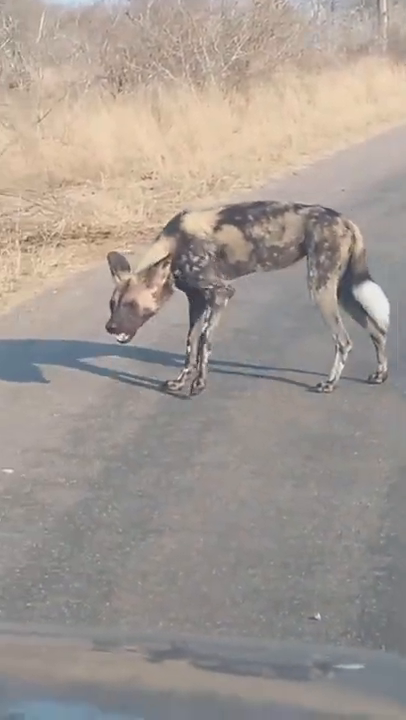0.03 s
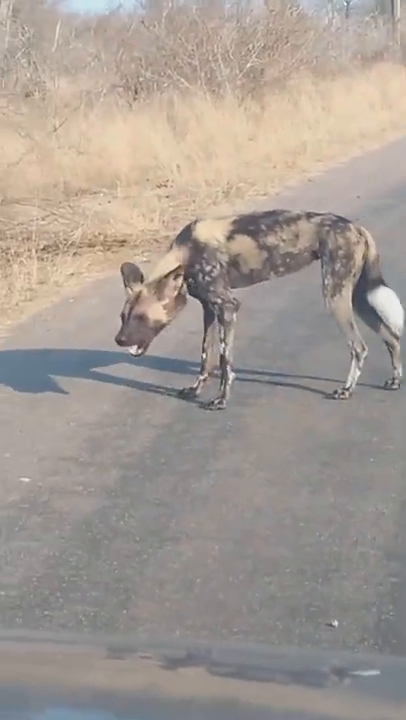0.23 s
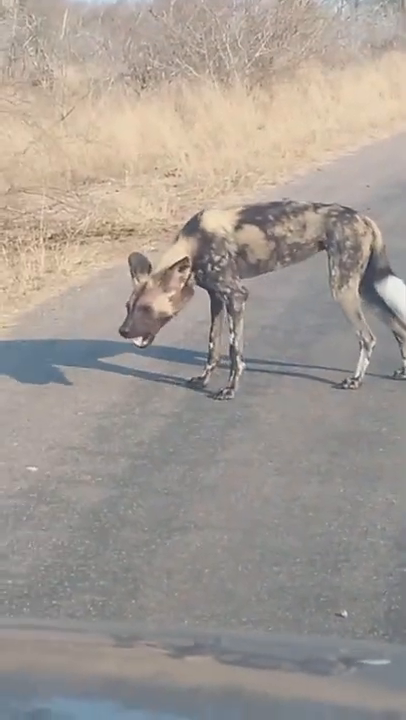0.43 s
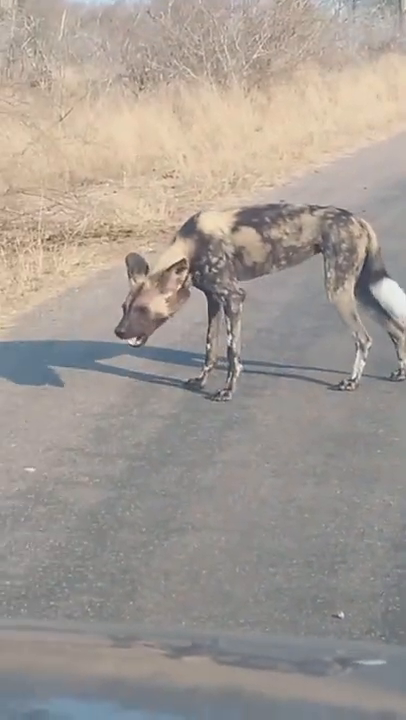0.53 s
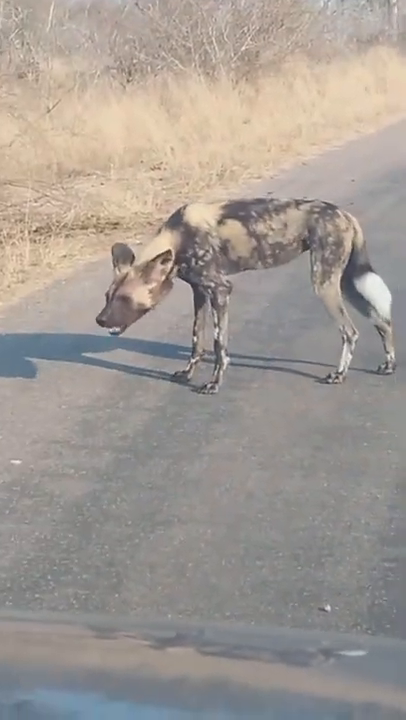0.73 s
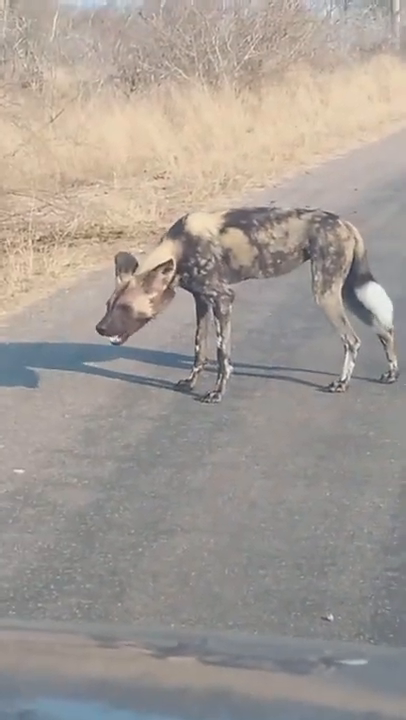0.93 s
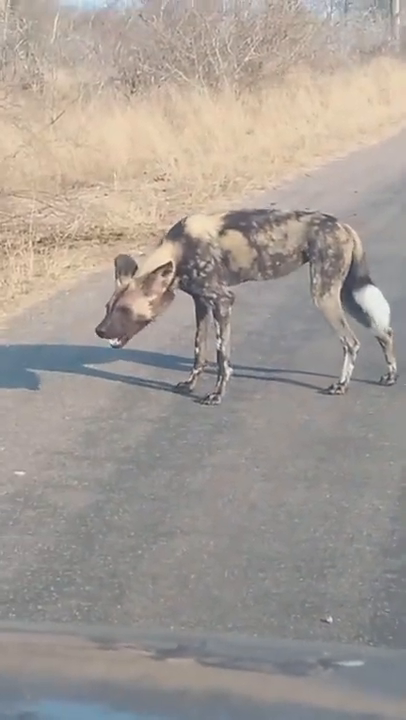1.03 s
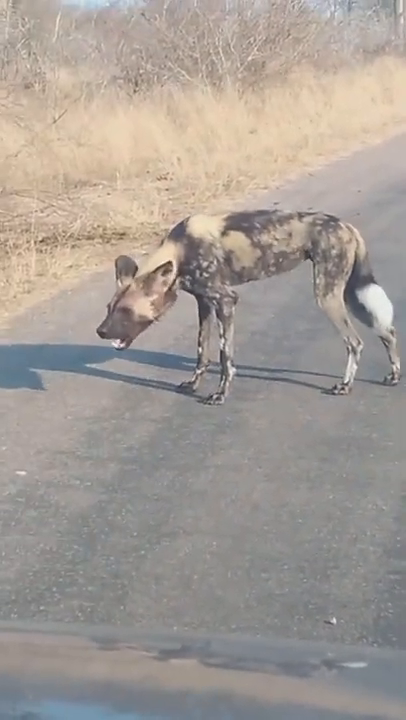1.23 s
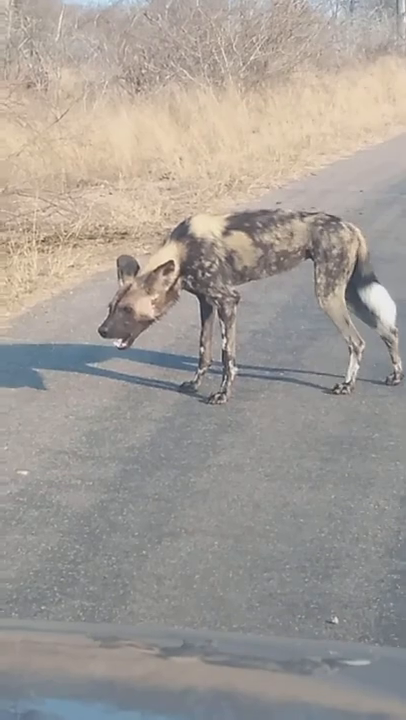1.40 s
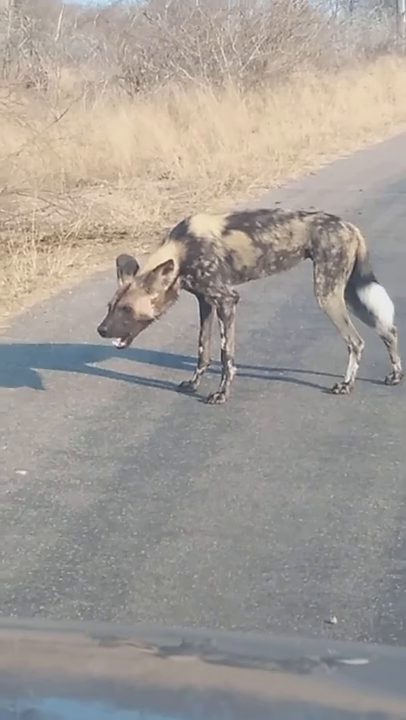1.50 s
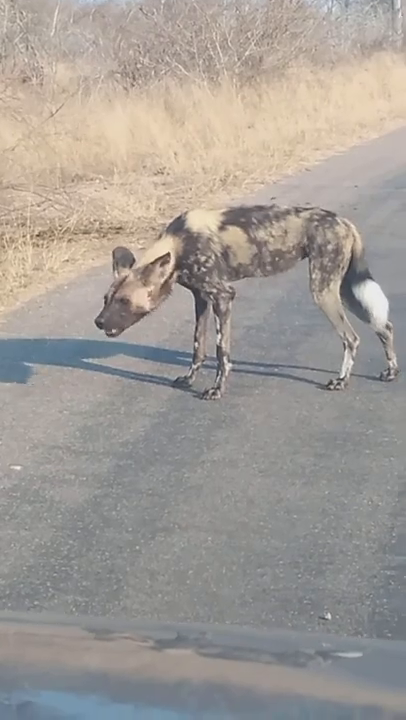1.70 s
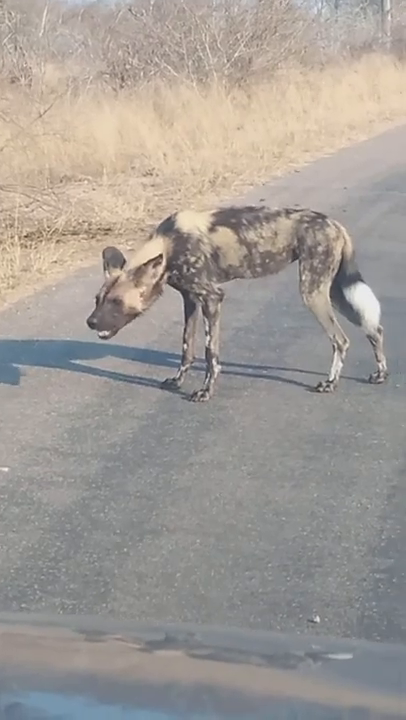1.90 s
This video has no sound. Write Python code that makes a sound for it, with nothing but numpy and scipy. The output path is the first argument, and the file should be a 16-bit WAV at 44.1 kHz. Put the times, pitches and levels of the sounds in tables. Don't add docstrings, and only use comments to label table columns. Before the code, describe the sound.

A wild dog hoots twice, each call short, mellow and nearly pure, scooping up then holding, about a second apart. A vehicle idles low close by in open dry bush; a phone takes it in from the car.

```python
import sys
import numpy as np
from scipy import signal
from scipy.fft import rfft, irfft, next_fast_len
from scipy.io import wavfile
from scipy.ndimage import uniform_filter1d, map_coordinates

SR = 44100
rng = np.random.default_rng(int(sys.argv[2]) if len(sys.argv) > 2 else 0)


def volts_from_decibels(level):
    exponent = np.asarray(level, float) / 20
    return 10 ** exponent


def dump_mix(stems):
    frames = np.atleast_2d(stems).T
    limited = np.clip(frames, -1, 1)
    pcm = np.round(limited * 32767).astype(np.int16)
    wavfile.write(sys.argv[1], SR, pcm)


N = 85995
T = np.arange(N) / SR
SIDE = np.array([[.5], [-.5]])

# time in seconds, level in dB, overtone level in dB, nasal hiss in dB.
HOOT_COURSE = [
    [(.195, -40.5, 1.5, -45), (.222, -20.5, 4, -51.5), (.255, -22.5, -11.5, -36.5), (.3, -20, -3.5, -35),
     (.355, -20, -4.5, -37.5), (.4, -26, 5, -58), (.49, -21.5, 1.5, -78.5), (.585, -27, 5, -18.5),
     (.645, -31.5, -21, -39)],
    [(1.205, -47.5, 5, -40), (1.238, -22, -8, -38), (1.27, -24.5, -3, -50.5), (1.32, -19.5, -7.5, -53),
     (1.355, -23.5, -3, -42), (1.4, -20, -1.5, -49.5), (1.47, -22.5, 0.5, -50), (1.582, -23, -4.5, -31),
     (1.612, -40.5, -13, -18)],
]
# start in seconds, length in seconds, top pitch in Hz, whistle level in dB.
VOICING = [
    (.197, .41, 691, 0),
    (1.214, .39, 685, 0),
]
START_HZ, SCOOP_HZ_PER_S, RISE_HZ, RISE_S, SAG_HZ = 530, 5300, 36, .065, 15
# multiple of the voice pitch, level in dB.
FIRST_OVERTONES = [(1, 0), (2, -30.5), (3, -53), (4, -66.5), (5, -39.5), (6, -54.5), (7, -42.5), (8, -32),
                   (9, -35.5), (10, -37), (11, -35.5), (12, -38.5), (13, -43.5), (14, -61.5), (15, -59.5),
                   (16, -53), (17, -51), (18, -55), (19, -66.5), (20, -67), (21, -64)]
SECOND_OVERTONES = [(1, 0), (2, -31.5), (3, -56.5), (4, -61.5), (5, -39), (6, -42), (7, -37.5), (8, -28.5),
                    (9, -38), (10, -45), (11, -38.5), (12, -30.5), (13, -51.5), (14, -51), (15, -52),
                    (16, -58.5), (17, -65.5), (18, -60), (19, -59), (20, -60), (21, -60)]
RING_GROWS_S, LATER_S, FADE_S = .08, .014, .015
# multiple, delay in seconds.
HELD_BACK = [{2: .035, 9: .03, 10: .06}, {2: .045, 9: .15, 10: .1}]
PROMPT = [(5, 7, 8), (5, 6, 7)]
CLOSING_SWELL = {6: 11, 8: 4, 14: 5, 16: 5}
CLOSING_S, CLOSING_WIDTH_S = -.035, .025
FLUTTER_DB, FRAY_RAD = 1.6, .17
# frequency in Hz, density in dB per Hz.
NASAL_HISS = [(7000, -120), (7600, -8.5), (8200, 11.5), (9500, -7.5), (9900, -25.5), (10600, -120)]

LEAD_S, LEAD_WIDTH_S, LEAD_DB, LEAD_HZ, LEAD_RISE_HZ_PER_S = 0, .007, -45.5, 1065, 4500
# frequency in Hz, density in dB per Hz.
THROAT_AIR = [(800, -120), (980, -8), (1070, 0), (1200, -8), (1350, -25), (1700, -120)]
THROAT_DB, THROAT_T60_S, THROAT_HELD_DB = -60, .5, -70
# time in seconds, pitch in Hz, level in dB.
THROAT_GULPS = [
    (.179, 620, -47),
    (1.186, 640, -54),
]
GULP_WIDTH_S = .005

# time in seconds, pitch in Hz, level in dB.
NOSE_WHISTLES = [
    [(.186, 9100, -80), (.2, 9120, -51), (.217, 9110, -59), (.243, 9290, -48), (.285, 9520, -52),
     (.32, 9560, -75), (.575, 9560, -80), (.592, 9480, -50), (.61, 9300, -70)],
    [(1.2, 9200, -80), (1.215, 9220, -64), (1.25, 9250, -44), (1.29, 9430, -46), (1.315, 9600, -50),
     (1.35, 9600, -72), (1.575, 9600, -78), (1.592, 9550, -50), (1.61, 9450, -70)],
]
SIDEBANDS = [
    [-4, -6, -15],
    [-1, -4, -21],
]
EARLY_SIDEBANDS = [.1, .7]

# frequency in Hz, density in dB per Hz.
ONSET_CATCH = [(3000, -120), (3500, -6.5), (3800, 3), (4300, -19.5), (5300, -17), (5800, -18.5), (7000, -120)]
CATCH_S, CATCH_WIDTH_S, CATCH_DB = 0.025, 0.012, -61
# frequency in Hz, density in dB per Hz.
CLOSING_PUFF = [(600, -60), (780, 0), (1000, -6), (1500, -14), (2500, -40), (5000, -29), (10800, -23),
                (12500, -55)]
PUFF_S, PUFF_WIDTH_S, PUFF_DB = -.02, .011, -48

# frequency in Hz, density in dB per Hz.
NOSTRIL_AIR = [(13600, -120), (14000, -4), (14500, 0), (14900, -6), (15200, -120)]
# time in seconds, width in seconds, level in dB.
NOSTRIL_BURSTS = [
    (.48, .045, -82),
    (1.33, .06, -78),
    (1.545, .016, -73),
]
# frequency in Hz, density in dB per Hz.
RASP_AIR = [(5500, -120), (5900, -6), (6300, 0), (6800, -3), (7200, -120)]
# time in seconds, width in seconds, level in dB.
RASP_BURSTS = [
    (1.3, .03, -66),
    (1.36, .03, -70),
    (.25, .02, -72),
]

# frequency in Hz, left minus right in dB.
SHADING = [(680, -5.5), (1370, 5.5), (3400, -0.5), (4200, 1), (5500, 2), (7500, 5), (9000, 10.5),
           (14000, 15.5)]
# frequency in Hz, lead of the left in radians.
LEFT_LEAD = [(680, 0.58), (1370, -1.36), (3400, -1.84), (5500, -1.25), (7500, -2), (9000, -2)]

# frequency in Hz, 60 dB decay time in seconds.
BUSH_DECAY = [(600, 0.93), (2000, 1), (6000, 0.51), (12000, 1)]
# frequency in Hz, gain in dB.
SCATTER_COLOUR = [(800, -1), (1300, 10.5), (9000, 10), (10500, 14), (12000, -0.5)]
BUSH_DB, BUSH_FAR_S, BUSH_EDGE_S, BUSH_STEP_DB = -15, .125, .01, -9
# delay in seconds, level in dB, left minus right in dB.
GROUND_ECHOES = [(.072, -25.5, -8.5), (.1007, -11, -3.5), (.125, -19.5, -3.5), (.21, -29, -7)]

# frequency in Hz, rms level in dB, left minus right in dB.
ENGINE_TONES = [(61.95, -45, 3), (111, -50.5, -1), (168.1, -52, 0.5), (222.6, -58.5, -0.5),
                (324.6, -59.5, 8)]
# frequency in Hz, density in dB per Hz.
ENGINE_RUMBLE = [(25, -20), (60, -17), (118, -1), (400, -12.5), (700, -19.5), (900, -24), (1150, -41.5),
                 (2200, -60.5)]
CYLINDERS = [0, -6, -2, -7]
# frequency in Hz, width in Hz, level in dB.
VALVE_COVER = [(1617, 42, 1.5), (1547, 60, -5), (1463, 86, -9.5)]
RUMBLE_DB, CYCLE_HZ, TICK_DB = -46, 7.15, -66.5

# frequency in Hz, density in dB per Hz.
AIR_HISS = [(1060, -39), (1800, -13), (1970, -3.5), (3440, -17), (6560, -12), (10000, -14.5), (15400, -23)]
# frequency in Hz, left-right likeness as a ratio.
COHERENCE = [(60, 0.93), (180, 0.89), (550, 0.78), (1640, 0.53), (4960, 0.04), (14900, 0.14)]
HISS_DB, DUCK_DB = -78.5, -24
# start in seconds, length in seconds, first pitch in Hz, last pitch in Hz.
BIRD_NOTES = [(1.765, .125, 6320, 6900), (1.875, .09, 6880, 6820), (.925, .045, 6880, 7000),
              (1.078, .1, 6860, 6880), (.75, .13, 2500, 2460), (.08, .05, 9280, 9280),
              (.11, .07, 8000, 8000), (.085, .03, 13800, 13800), (1.04, .036, 7850, 7700),
              (1.17, .02, 7050, 7500), (1.28, .02, 6200, 6230), (1.298, .03, 6450, 6600)]
# level in dB, left minus right in dB.
BIRD_LEVELS = [(-73.5, 11.5), (-76.5, 9), (-85, -14), (-86, -10), (-84.5, -15), (-87.5, 11.5), (-87, 12),
               (-85, 12), (-85, -10), (-84, 0), (-62, 0), (-69, 0)]
# frequency in Hz, density in dB per Hz.
LIP_SMACK = [(4500, -60), (5300, -4), (6300, -14), (7400, 0), (8500, -12), (10500, -3), (11300, -60)]
SMACK_S, SMACK_WIDTH_S, SMACK_DB = 1.18, .007, -77
# frequency in Hz, density in dB per Hz.
PAW_GRIT = [(6000, -120), (7500, -8), (11000, -18), (14000, -9), (15200, -120)]
SCUFF_S, SCUFF_LENGTH_S, SCUFF_DB = 0.094, 0.078, -71.5


def unit(x):
    return x / np.sqrt(np.mean(x ** 2) + 1e-20)


def along(points, hz):
    f, v = np.transpose(points)
    return np.interp(np.log(hz + 1), np.log(f + 1), v)


def wobble(rate):
    return map_coordinates(rng.standard_normal(size=800), [T * rate])


def bump(s, width):
    return np.exp(-.5 * ((T - s) / width) ** 2)


def columns(rows):
    s, *cols = np.transpose(rows)
    curves = [np.interp(T, s, c) for c in cols]
    gate = np.clip((T - s[0]) / .004, 0, 1) * np.clip((s[-1] - T) / .012, 0, 1)
    return curves + [gate]


def filtered(x, response):
    m = next_fast_len(N + SR // 2)
    return irfft(rfft(x, m) * response(np.fft.rfftfreq(m, 1 / SR)), m)[..., :N]


def tone(hz):
    return np.sqrt(2) * np.sin(2 * np.pi * (np.cumsum(hz) / SR + rng.random()))


def noise(spectrum):
    return unit(filtered(rng.standard_normal(N), lambda f: volts_from_decibels(along(spectrum, f))))


def rush(spectrum, patchy_db):
    z = signal.stft(rng.standard_normal((2, N + 512)), nperseg=512)[2]
    field = uniform_filter1d(rng.standard_normal(z.shape[1:]), size=6, axis=0)
    field = uniform_filter1d(field, size=14, axis=1)
    pair = signal.istft(z * volts_from_decibels(patchy_db * unit(field)), nperseg=512)[1][:, :N]

    def mid_side(hz):
        inside = (hz > spectrum[0][0]) * (hz < spectrum[-1][0])
        turn = np.arccos(np.clip(along(COHERENCE, hz), -1, 1)) / 2
        return volts_from_decibels(along(spectrum, hz)) * inside * [np.cos(turn), np.sin(turn)]

    mid, side = filtered(pair, mid_side)
    return unit(np.array([mid + side, mid - side]))


def voice_pitch(which):
    start, length, top_hz, _ = VOICING[which]
    u = np.clip(T - start, 0, length)
    held = top_hz - RISE_HZ * np.exp(-u / RISE_S) - SAG_HZ * (u / length) ** 4
    return uniform_filter1d(np.minimum(START_HZ + SCOOP_HZ_PER_S * u, held), size=400)


def voice(which, overtones, hz):
    start, length = VOICING[which][:2]
    level_db, ring_db, hiss_db, on = columns(HOOT_COURSE[which])
    t = T - start
    phase = 2 * np.pi * np.cumsum(hz * (1 + 0.0018 * wobble(40))) / SR
    voiced = np.sin(phase)
    for k, db in overtones[1:]:
        delay = .02 + LATER_S * max(k - 13, 0) + HELD_BACK[which].get(k, 0)
        growth_s = RING_GROWS_S / (4 if k in PROMPT[which] else 1)
        grown = np.clip((t - delay) / growth_s, 0, 1)
        grown = grown * np.clip((length - t - .001 * k) / FADE_S, 0, 1)
        closing_db = CLOSING_SWELL.get(k, 0) * bump(start + length + CLOSING_S, CLOSING_WIDTH_S)
        flutter_db = (k > 2) * FLUTTER_DB * (3 if k == 3 else 1) * wobble(150)
        size = volts_from_decibels(db + ring_db + 1.6 * wobble(35) + flutter_db + closing_db)
        fray = (k > 2) * FRAY_RAD * wobble(170)
        voiced += grown * size * np.sin(round(k) * phase + fray + 2 * np.pi * rng.random())
    hiss = volts_from_decibels(hiss_db + 3 * wobble(60)) * noise(NASAL_HISS)
    return volts_from_decibels(level_db) * on * (np.sqrt(2) * voiced + hiss)


def throat(which):
    start, length = VOICING[which][:2]
    on = columns(HOOT_COURSE[which])[-1]
    t = T - start
    u = np.clip(t, 0, length)
    lead_hz = LEAD_HZ + LEAD_RISE_HZ_PER_S * np.clip(t, -.02, .03)
    lead = volts_from_decibels(LEAD_DB) * bump(start + LEAD_S, LEAD_WIDTH_S) * tone(lead_hz)
    air = volts_from_decibels(THROAT_DB - 60 * u / THROAT_T60_S) + volts_from_decibels(THROAT_HELD_DB)
    lead += np.clip(t / 0.005, 0, 1) * on * air * noise(THROAT_AIR)
    gulp_s, gulp_hz, gulp_db = THROAT_GULPS[which]
    return lead + volts_from_decibels(gulp_db) * bump(gulp_s, GULP_WIDTH_S) * tone(gulp_hz + 0 * T)


def nose_whistle(which, hz):
    start, _, _, blow_db = VOICING[which]
    whistle_hz, whistle_db, blown = columns(NOSE_WHISTLES[which])
    under = 0
    for k, db in enumerate(SIDEBANDS[which]):
        under = under + volts_from_decibels(db + 0.73 * wobble(40)) * tone(whistle_hz - (k + 1) * hz)
    coupling = np.clip((T - start - .015) / .015, EARLY_SIDEBANDS[which], 1)
    lines = tone(whistle_hz) + coupling * under
    return volts_from_decibels(whistle_db + blow_db + 2.9 * wobble(90)) * blown * lines


def catch_and_puff(which):
    start, length = VOICING[which][:2]
    catch = volts_from_decibels(CATCH_DB) * bump(start + CATCH_S, CATCH_WIDTH_S) * noise(ONSET_CATCH)
    puff = volts_from_decibels(PUFF_DB) * bump(start + length + PUFF_S, PUFF_WIDTH_S) * noise(CLOSING_PUFF)
    return catch + puff


def hoot(which, overtones):
    hz = voice_pitch(which)
    return voice(which, overtones, hz) + throat(which) + catch_and_puff(which) + nose_whistle(which, hz)


def thin_air():
    wheeze = sum(volts_from_decibels(db) * bump(s, width) for s, width, db in NOSTRIL_BURSTS) * noise(NOSTRIL_AIR)
    rasp = sum(volts_from_decibels(db) * bump(s, width) for s, width, db in RASP_BURSTS) * noise(RASP_AIR)
    return wheeze + rasp


def placed(x):
    return filtered(x, lambda hz: volts_from_decibels(SIDE * along(SHADING, hz)) * np.exp(1j * SIDE * along(LEFT_LEAD, hz)))


def bush(x):
    x = filtered(x, lambda hz: volts_from_decibels(along(SCATTER_COLOUR, hz)))
    hz, t, z = signal.stft(rng.standard_normal((2, SR // 2)), SR, nperseg=256)
    step_db = BUSH_STEP_DB / (1 + np.exp((BUSH_FAR_S - t) / BUSH_EDGE_S))
    decay_db = step_db - 60 * t / along(BUSH_DECAY, hz)[:, None]
    tail = signal.istft(z * volts_from_decibels(decay_db), SR, nperseg=256)[1]
    delayed = np.pad(x, (600, 0))[None]
    return volts_from_decibels(BUSH_DB) * signal.fftconvolve(delayed, tail / np.linalg.norm(tail[0]), axes=1)[:, :N]


def bank(x):
    def response(hz):
        paths = sum(volts_from_decibels(db + SIDE * pan) * np.exp(-2j * np.pi * hz * s) for s, db, pan in GROUND_ECHOES)
        return paths / (1 + ((hz - 700) / 75) ** 4)

    return filtered(x, response)


def valve_ticks():
    firing = (4 * CYCLE_HZ * (T + 0.021)) % 1
    which = np.floor(4 * CYCLE_HZ * (T + 0.0079)).astype(int) % 4
    knocks = rng.standard_normal((2, N)) * volts_from_decibels(np.array(CYLINDERS)[which] - 18 * firing)
    knocks[1] = 2.3 * knocks[0] + 0.16 * knocks[1]

    def cover(f):
        return sum(volts_from_decibels(db) * (1j * f * w / (c * c - f * f + 1j * f * w)) ** 2 for c, w, db in VALVE_COVER)

    return volts_from_decibels(TICK_DB) * unit(filtered(knocks, cover))


def engine():
    tones = 0
    for hz, db, pan in ENGINE_TONES:
        tones = tones + volts_from_decibels(db + SIDE * pan + 0.8 * wobble(8)) * tone(hz * (1 + .015 * wobble(13)))
    return tones + volts_from_decibels(RUMBLE_DB) * rush(ENGINE_RUMBLE, patchy_db=1.5) + valve_ticks()


def lip_smack():
    return volts_from_decibels(SMACK_DB) * bump(SMACK_S, SMACK_WIDTH_S) * noise(LIP_SMACK)


def scuff():
    u = np.clip((T - SCUFF_S) / SCUFF_LENGTH_S, 0, 1)
    envelope = np.sin(np.pi * u) ** 0.61 * volts_from_decibels(6.6 * wobble(100))
    return volts_from_decibels([[SCUFF_DB], [SCUFF_DB - 34]]) * envelope * rush(PAW_GRIT, patchy_db=3.0)


def birds():
    out = np.zeros((2, N))
    for (s, length, from_hz, to_hz), (db, pan) in zip(BIRD_NOTES, BIRD_LEVELS):
        u = np.clip((T - s) / length, 0, 1)
        level = volts_from_decibels(db + SIDE * pan + 2.5 * wobble(49.8))
        out += level * np.sin(np.pi * u) ** 0.53 * tone(from_hz + (to_hz - from_hz) * u)
    return out


def surroundings():
    return lip_smack() + scuff() + birds() + volts_from_decibels(HISS_DB) * rush(AIR_HISS, patchy_db=1.5)


def scene():
    dog = hoot(0, FIRST_OVERTONES) + hoot(1, SECOND_OVERTONES)
    loud = uniform_filter1d(np.abs(dog), size=2000)
    loud = np.maximum(loud, .4 * np.pad(loud, (4400, 0))[:N])
    duck = volts_from_decibels(DUCK_DB * np.abs(loud / loud.max()) ** (1 / 3))
    return placed(dog + thin_air()) + bush(dog) + bank(dog) + engine() + duck * surroundings()


def top_cut(x):
    return signal.sosfilt(signal.butter(12, 15540, fs=SR, output="sos"), x)


def record(dry):
    return top_cut(dry)


dry = scene()
out = record(dry)
dump_mix(out)
```